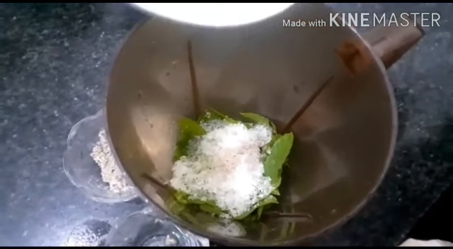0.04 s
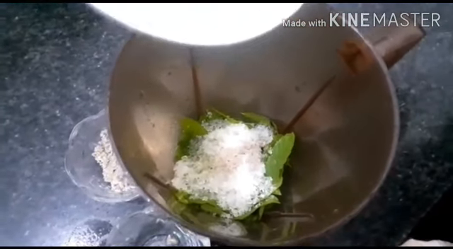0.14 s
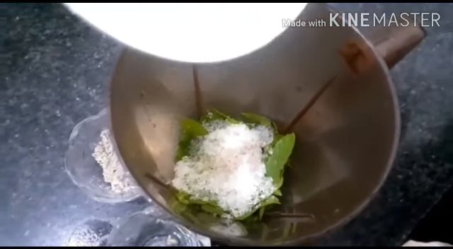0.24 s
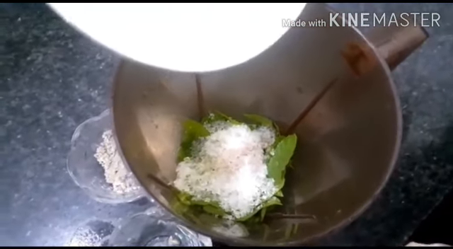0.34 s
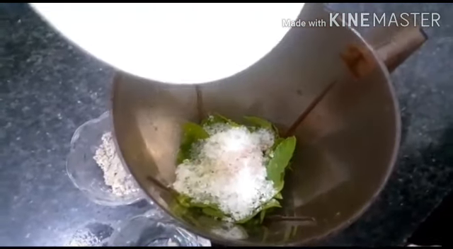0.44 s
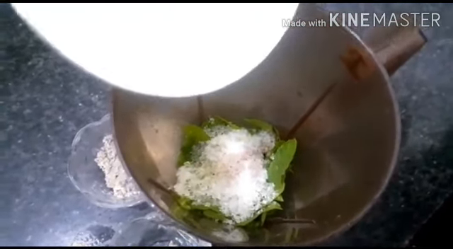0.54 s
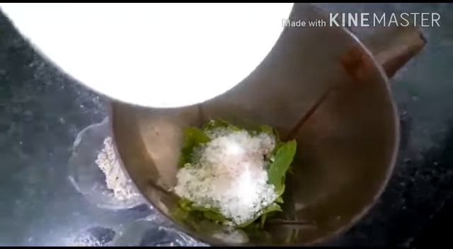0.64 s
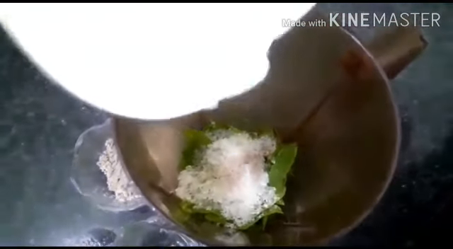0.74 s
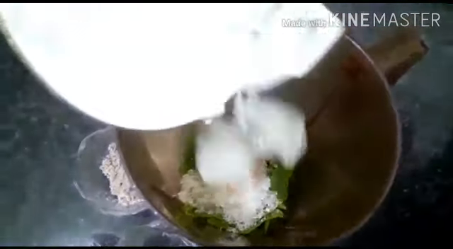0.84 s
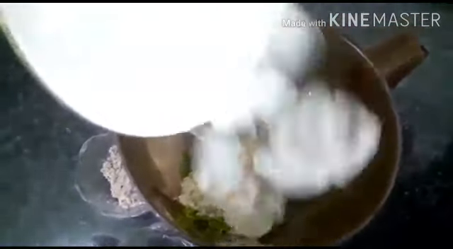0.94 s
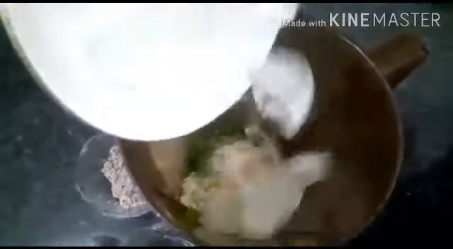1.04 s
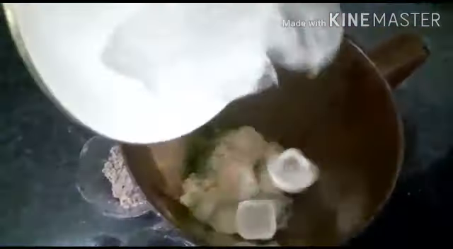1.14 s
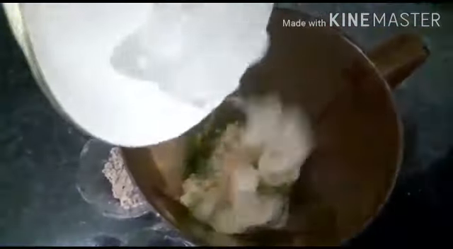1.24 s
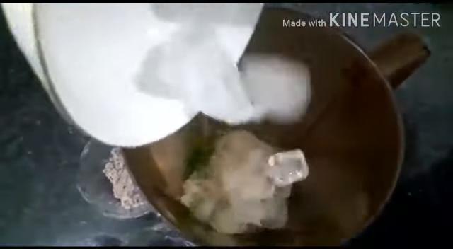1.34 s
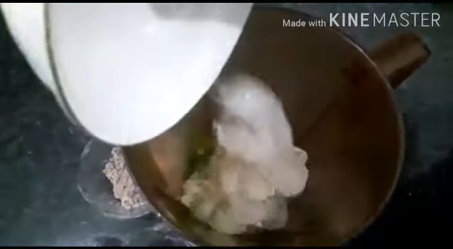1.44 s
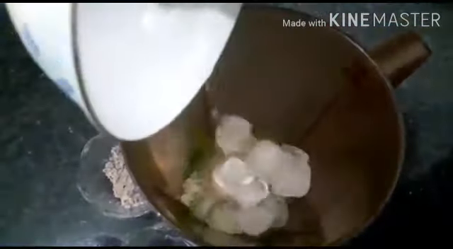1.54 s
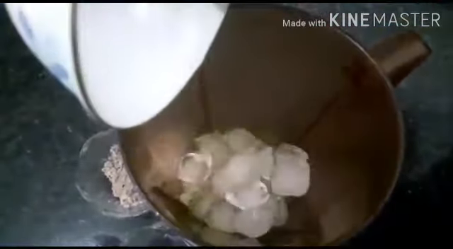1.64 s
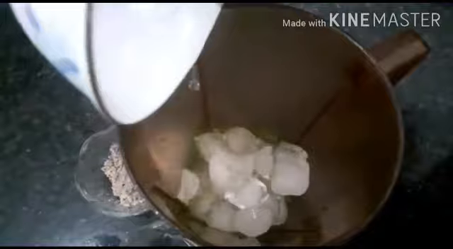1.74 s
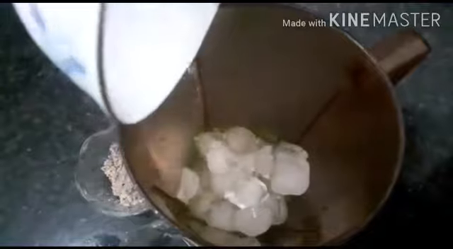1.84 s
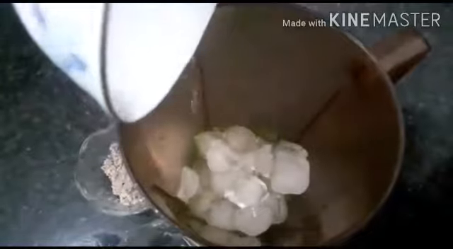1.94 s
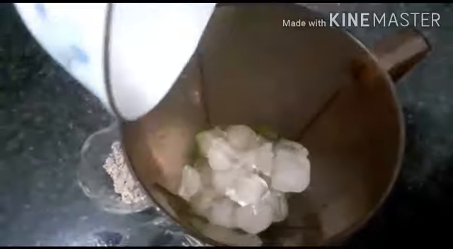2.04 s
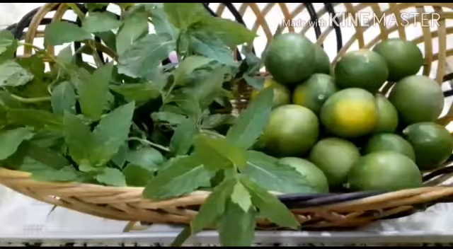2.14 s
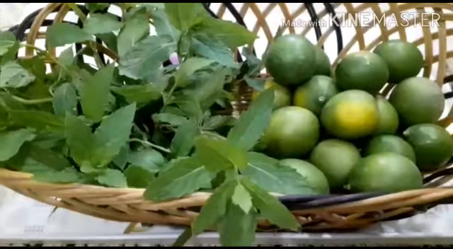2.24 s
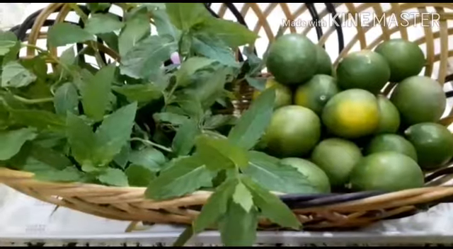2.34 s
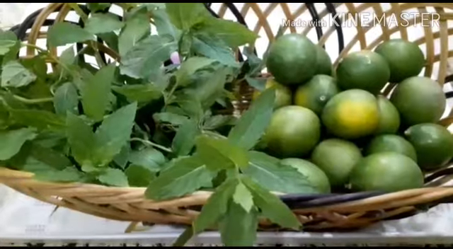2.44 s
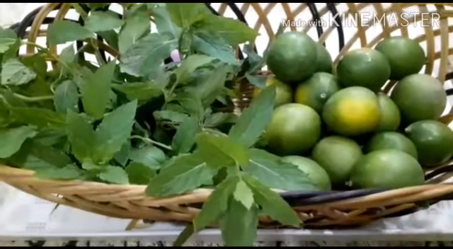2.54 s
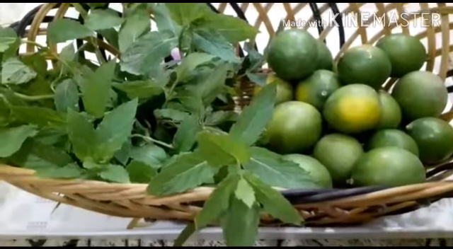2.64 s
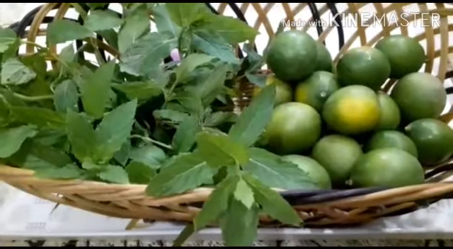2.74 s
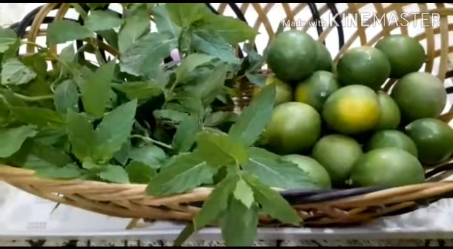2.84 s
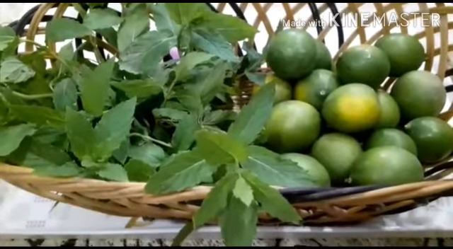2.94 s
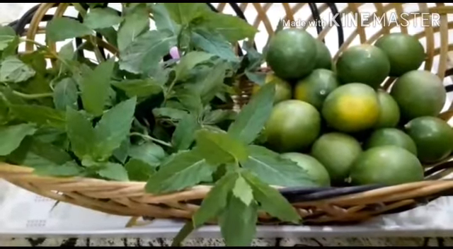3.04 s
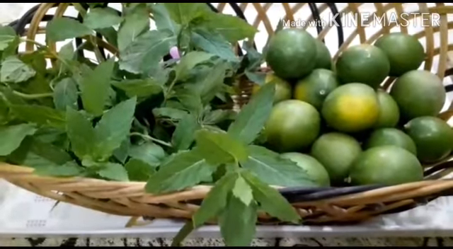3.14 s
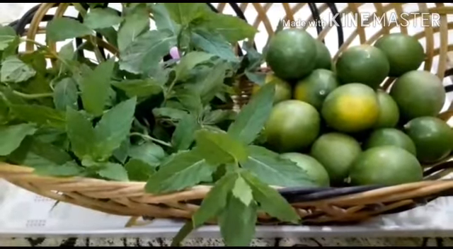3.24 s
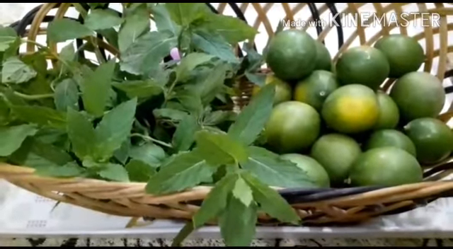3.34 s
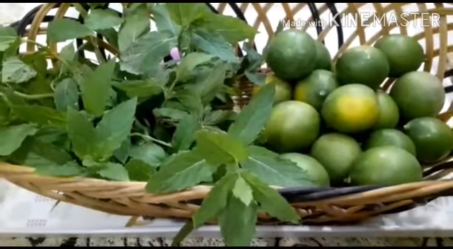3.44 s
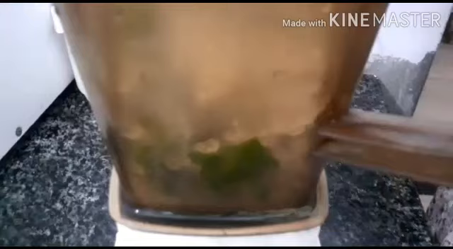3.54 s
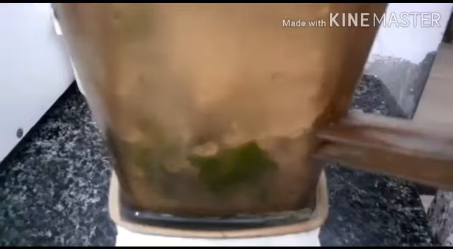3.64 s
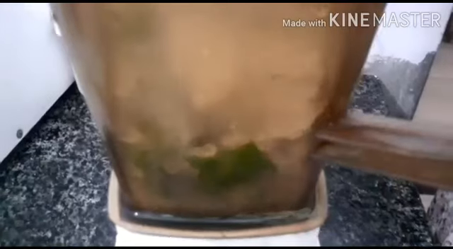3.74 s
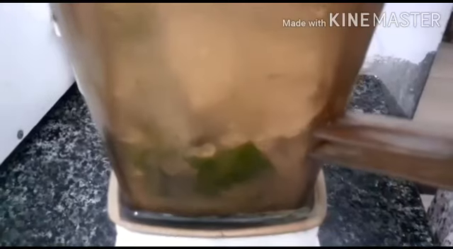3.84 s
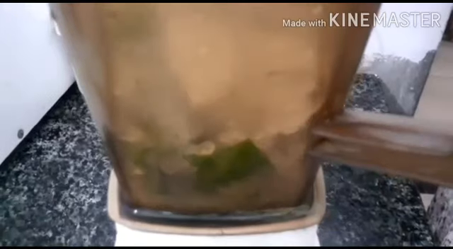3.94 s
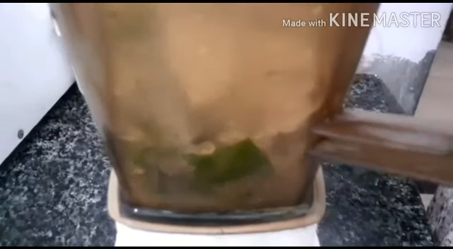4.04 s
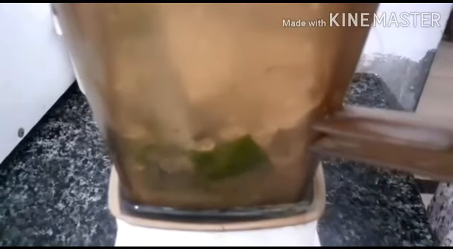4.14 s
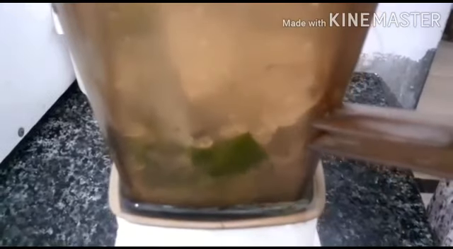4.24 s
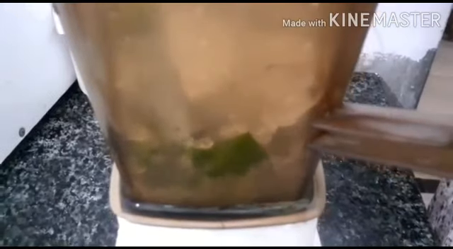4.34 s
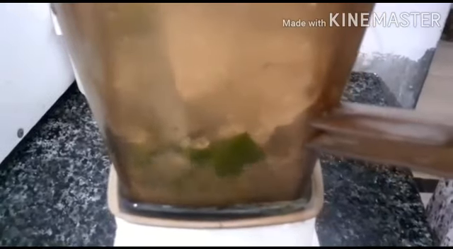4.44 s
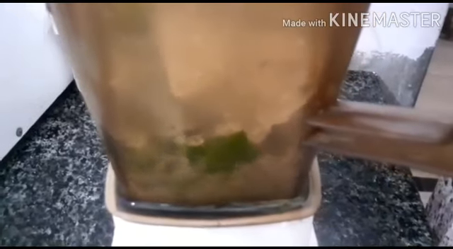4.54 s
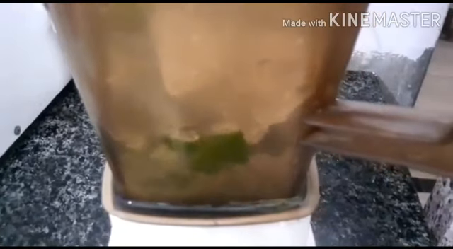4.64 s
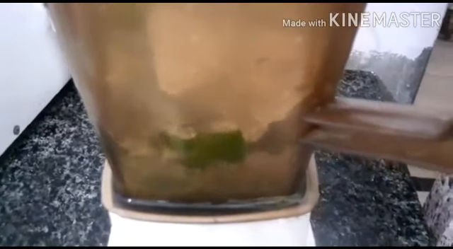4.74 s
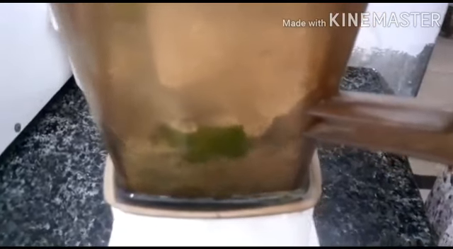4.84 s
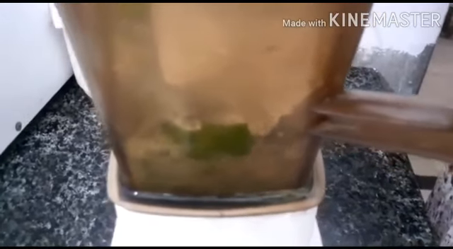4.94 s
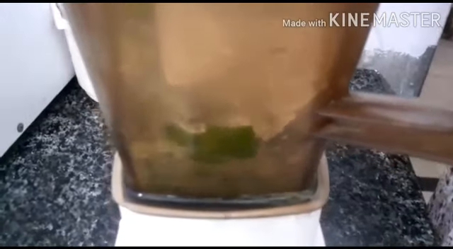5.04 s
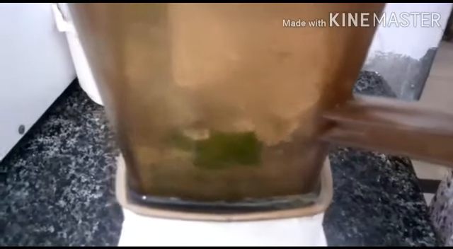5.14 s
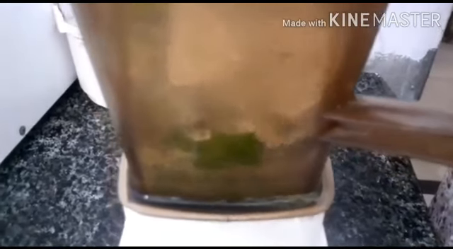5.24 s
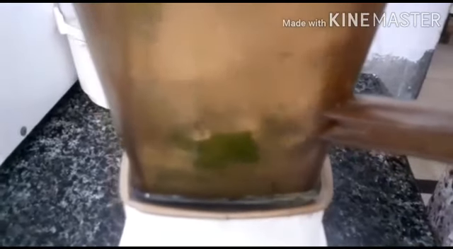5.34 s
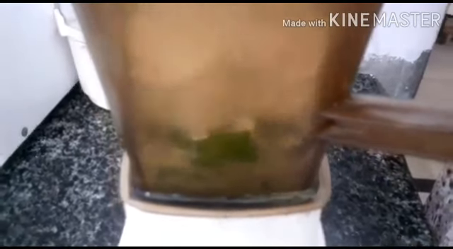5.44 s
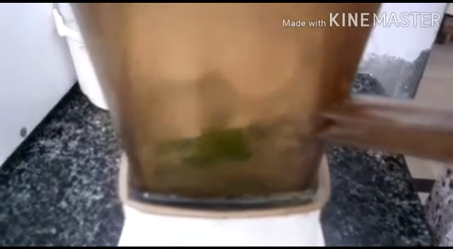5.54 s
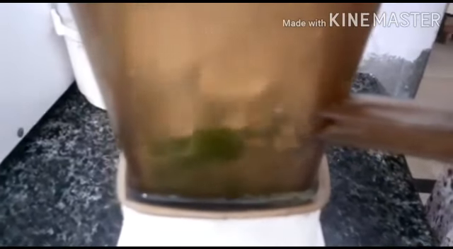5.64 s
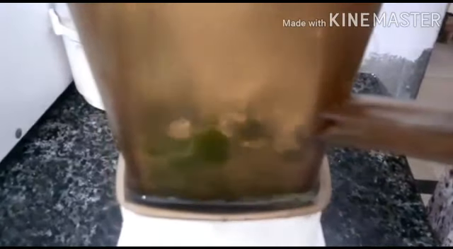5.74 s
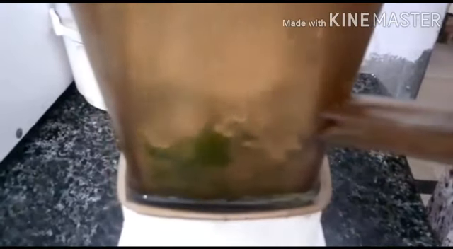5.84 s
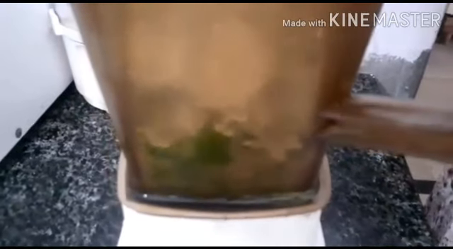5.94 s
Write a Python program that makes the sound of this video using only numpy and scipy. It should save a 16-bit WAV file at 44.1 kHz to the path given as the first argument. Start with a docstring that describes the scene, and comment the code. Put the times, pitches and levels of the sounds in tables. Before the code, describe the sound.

In a tiled kitchen, close up, a bowl thumps a hollow blender jar, then ice slides and tumbles in with bright cracks and ringing knocks. A short cut leads to faint room air. Then a blender motor roars steadily over churning slush, is switched off, and falls in pitch while the last lumps rattle.

```python
"""Ice poured and blended

Three short kitchen scenes. A bowl bumps a blender jar and tips ice cubes into it; a quiet room;
then the blender runs on ice, leaves and sugar, is switched off and coasts down while the last lumps rattle.
Knocks are damped modes and short noise bursts, the motor is a bank of shaft overtones,
and slush, brush hiss, sliding ice and room air are coloured noise."""
import sys
import numpy as np
from scipy import signal
from scipy.fft import rfft, irfft, next_fast_len
from scipy.io import wavfile

SR = 44100
rng = np.random.default_rng(int(sys.argv[2]) if len(sys.argv) > 2 else 0)


def master(y):
    """Save y as 16-bit WAV."""
    cut = np.clip(np.atleast_2d(y).T, -1, 1)
    pcm = np.round(cut * 32767)  # scale
    wavfile.write(sys.argv[1], SR, pcm.astype(np.int16))


N = 263718
TIME = np.arange(N) / SR

# ice striking the jar, poured in, later kicked by the blades; callers offset the levels:
# (time [s], knock level [dB], crack level [dB], knock pitch [Hz])
ICE_HITS = [(1.027, -11.5, -20.5, 1712), (1.058, -22, -23.5, 2200), (1.088, -12, -24.5, 1693),
            (1.103, -18, -21.5, 900), (1.112, -17.5, -22, 1770), (1.128, -15, -18, 990),
            (1.141, -12, -23, 1780), (1.171, -23, -33, 991), (1.222, -13.5, -19.5, 1720),
            (1.293, -18, -30, 1770), (1.359, -13, -20, 998), (1.494, -32, -35.5, 1026),
            (1.506, -16.5, -18.5, 1003), (1.532, -20, -28, 1760), (1.577, -14, -21.5, 950),
            (1.599, -28, -28.5, 851), (1.647, -19.5, -24.5, 936), (1.664, -30, -36, 850),
            (1.729, -19.5, -23.5, 948), (1.744, -22.5, -22, 950), (1.821, -37, -32.5, 1010),
            (1.838, -37, -36, 1820), (5.386, -18, -20.5, 1010), (5.503, -23, -27.5, 1090),
            (5.612, -25, -29, 1010), (5.683, -21.5, -19.5, 990), (5.7, -27, -20.5, 1100),
            (5.723, -25, -24, 985), (5.748, -26, -27, 1020), (5.864, -30, -45, 943),
            (5.911, -30.5, -46, 921)]
# spectra of a lump's knock, its crack and the thud on the base: (frequency [Hz], density [dB per Hz])
KNOCK_SPECTRUM = [(400, -15.5), (700, -4.5), (1000, 4.5), (1400, -7.5), (1780, 9), (2200, -6), (2800, -15)]
CRACK_SPECTRUM = [(1350, -26.5), (2300, 3.5), (2410, -2), (2630, 2.5), (2950, -4), (3240, 0), (4830, -3.5),
                  (5990, -4), (7200, -11.5), (8250, -10.5), (10100, -24.5), (13000, -18), (15500, -26.5)]
THUD_SPECTRUM = [(120, -34.5), (240, -13), (315, 6), (400, -8.5), (480, 3.5), (620, -14.5), (900, -26)]
# stereo balance of room air and of motor noise: (frequency [Hz], left-right difference [dB])
AIR_BALANCE = [(100, -1.5), (400, -4.5), (5000, -5)]
MOTOR_BALANCE = [(100, 2), (260, -8), (500, 8.5), (1000, -5), (2000, -1), (4500, -3), (8000, -2),
                 (12000, 4)]

RUN_HZ, OFF_S, COAST_FROM_S = 261.3, 4.96, 4.983  # shaft speed; switch-off; start of coasting
ICE_T60_S, ICE_RISE_S, ICE_PAN_DB = .047, 0.0023, -2.8
HEAP_FROM_S = 1.125  # ice starts to pile up in the jar


def amp(db):
    """Decibels to amplitude."""
    return 10 ** (np.asarray(db) / 20)


def unit(x):
    """Scales to unit RMS."""
    return x / np.sqrt(np.mean(x ** 2) + 1e-20)


def ramp(start_s, length_s):
    """Rises from 0 to 1 over a stretch of time."""
    return np.clip((TIME - start_s) / max(length_s, 1 / SR), 0, 1)


def read(points, hz):
    """A curve joined by straight lines over log frequency."""
    f, value = np.transpose(points)
    return np.interp(np.log(hz + 1), np.log(f + 1), value)


def shape(points):
    """A spectrum as a gain function that falls away beyond both ends."""
    low_hz, high_hz = points[0][0], points[-1][0]

    def gain(hz):
        low_cut = 1 + (low_hz / (hz + 1) / 2) ** 4
        high_cut = 1 + (hz / high_hz / 2) ** 4
        return amp(read(points, hz)) / low_cut / high_cut
    return gain


def peaks(modes, hz):
    """Power-summed gain of resonances, each with centre, half-power width and level."""
    return np.sqrt(sum(amp(db) ** 2 / (1 + (2 * (hz - f) / width) ** 2) for f, width, db in modes))


def sides(db):
    """Left and right gains for a level difference."""
    return amp(np.array([db, -db]) / 2).reshape(2, -1)


def add(mix, s, sound):
    """Adds a sound at a time, cut off at the end of the mix."""
    part = mix[:, max(round(s * SR), 0):][:, :sound.shape[1]]
    part += sound[:, :part.shape[1]]


def wander(rate_hz):
    """Slow random fluctuation of unit RMS."""
    hz = np.fft.rfftfreq(N, 1 / SR)
    return unit(irfft(rfft(rng.standard_normal(N)) / (1 + (hz / rate_hz) ** 4), N))


def noise(gain, size=N, pan=((100, 0), (10000, 0))):
    """Coloured noise at two microphones, alike in the bass and unrelated in the treble."""
    # (frequency [Hz], left-right correlation [-])
    likeness = [(100, 0.74), (300, 0.72), (600, 0.72), (1000, 0.45), (2000, 0), (15000, 0.015)]
    length = next_fast_len(size, True)
    hz = np.fft.rfftfreq(length, 1 / SR)
    a, b = rfft(rng.standard_normal((2, length)))
    same = np.clip(read(likeness, hz), -1, 1)
    pair = np.array([a, same * a + np.sqrt(1 - same ** 2) * b])
    return unit(irfft(pair * gain(hz) * sides(read(pan, hz)), length)[:, :size])


def burst(gain, t60_s, rise_s, size=8192):
    """A dense cluster of short modes as decaying noise, unit RMS over its first 20 ms."""
    t = np.arange(size) / SR
    onset = 1 - np.exp(-(t / rise_s) ** 2)
    cluster = noise(gain, size=size) * onset * amp(-60 * t / max(t60_s, .004))
    return cluster / np.sqrt(np.mean(cluster[:, :SR // 50] ** 2))


def ring(modes, size=16384, rise_s=.001):
    """Damped modes (Hz, dB, t60 s), own phase per microphone, unit RMS over the first 20 ms."""
    t = np.arange(size) / SR
    phases = 2 * np.pi * rng.random((len(modes), 2, 1))
    out = 0
    for (hz, db, t60_s), (start, spread) in zip(modes, phases):
        apart = np.array([[0], [1]]) * (spread - np.pi) * min(hz / 2400, 1)
        out = out + amp(db - 60 * t / max(t60_s, .005)) * np.sin(2 * np.pi * hz * t + start + apart)
    out = out * (1 - np.exp(-t / rise_s))
    return out / np.sqrt(np.mean(out[:, :SR // 50] ** 2))


def room(x, gap_s=0.0028):
    """Tiled kitchen: a diffuse tail after a short gap, each band dying at its own speed."""
    # (frequency [Hz], reverberation time t60 [s])
    band_t60 = [(150, 1), (400, 0.53), (1000, 0.53), (2000, 0.52), (4500, 0.43), (8000, 0.35),
                (15000, 0.51)]
    tail = noise(np.ones_like, size=SR) * np.clip(TIME[:SR] / gap_s - 1, 0, 1)
    hz, t, z = signal.stft(tail, SR, nperseg=256)
    decay = amp(-60 * t / read(band_t60, hz)[:, None])
    tail = signal.istft(z * decay, SR, nperseg=256)[1]
    return signal.fftconvolve(x, tail / np.linalg.norm(tail[0]), axes=1)[:, :N]


def quiet_room():
    """Steady room air as coloured noise."""
    # (frequency [Hz], density [dB per Hz])
    air_spectrum = [(18, -52), (30, -26.5), (75, -21), (125, 1), (158, -10), (185, -4.5), (337, 0.5),
                    (364, 0), (426, -11), (612, -17.5), (881, -18), (1030, -23), (2630, -40), (2920, -44),
                    (15000, -51)]
    return amp(-54.5) * noise(shape(air_spectrum), pan=AIR_BALANCE)


def kitchen_air():
    """Room air as coloured noise, joined by a faint phase-wandering tone late in the pouring."""
    # (frequency [Hz], density [dB per Hz])
    air_spectrum = [(18, -45.5), (30, -29), (92, -3), (200, -4), (260, -11), (304, 2.5), (426, -16.5),
                    (497, -8.5), (774, -29.5), (859, -13.5), (1110, -27), (1780, -26), (15000, -52)]
    air = amp(-48.5) * noise(shape(air_spectrum), pan=AIR_BALANCE)
    tone = np.sin(2 * np.pi * 520 * TIME + .4 * wander(12))
    return air + amp(-52) * ramp(2.05, 0.036) * tone


def bumps(tick_t60_s=0.06, boom_db=-16, boom_t60_s=0.53, boom_rise_s=.02):
    """The bowl knocks the jar: damped modes and a tick; the hollow jar and base boom on."""
    # bowl against jar: (time [s], ring level [dB], tick level [dB])
    blows = [(0.009, -10, -26), (0.3233, -32, -38)]
    # jar on its base: (frequency [Hz], level [dB], t60 [s])
    base_modes = [(194, -14, 0.07), (270, -20, 0.017), (324, 11.5, 0.024), (457, 9.5, 0.034),
                  (594, -11.5, .06), (863, -16.5, 0.13), (999, -11.5, 0.099), (1074.6, -9, 0.12),
                  (1550, -21, 0.053), (1750, -26.5, .1), (2094, -28, 0.058)]
    boom_modes = [(151, -9), (318, -2), (337, 1), (455, -6), (490, -2.5), (598, -16), (1005, -16.5)]  # Hz, dB
    tick = shape([(400, -8.5), (850, 5.5), (1100, 6.5), (1400, -4), (1800, -5), (3000, -10.5),
                  (6000, -24.0), (15000, -43.5)])  # Hz, dB per Hz
    out, t = np.zeros((2, N)), TIME[:SR]
    for s, ring_db, tick_db in blows:
        blow = sum(amp(db - 60 * t / t60_s) * np.sin(2 * np.pi * hz * t) for hz, db, t60_s in base_modes)
        boom = sum(amp(db + boom_db - 60 * t / boom_t60_s) * np.sin(2 * np.pi * hz * t)
                   for hz, db in boom_modes)
        blow = blow * (1 - np.exp(-(t / 0.0022) ** 2))
        boom = boom * (1 - np.exp(-t / boom_rise_s))
        add(out, s, amp(ring_db) * (blow + boom) * sides(-1.5))
        add(out, s, amp(tick_db) * burst(tick, tick_t60_s, .002))
    return out


def bowl(knock_t60_s=0.012, crack_t60_s=.012, scrape_db=-6, thud_t60_s=.2):
    """Cubes slide and clink in the hand-held bowl, which damps them quickly."""
    # cubes knocking together: (time [s], knock level [dB], crack level [dB])
    clinks = [(0.777, -39, -49.5), (0.859, -40.5, -53.5), (0.886, -33, -45.5), (0.900, -19, -33),
              (0.933, -38.5, -38), (0.964, -41.5, -29.5), (0.978, -37, -23)]
    # bowl resonances, gain squared below: (frequency [Hz], width [Hz], level [dB])
    wall_modes = [(1610, 150, 1), (1780, 250, 0.5), (2134, 73, -7)]
    # cube resonances, gain to the power 1.3 below: (frequency [Hz], width [Hz], level [dB])
    cube_modes = [(2900, 1600, -8), (3900, 700, 2.5), (5300, 900, -10), (6600, 700, -1),
                  (12500, 2500, -13.5)]
    creep_s, loose_s, rim_s = 0.39, .78, 1.02  # ice creeps, breaks loose, leaves over the rim
    creep_db, slide_db, growth_db_per_s, release_db_per_s = -70, -39.5, 48, 599.5

    def wall(hz):
        return peaks(wall_modes, hz) ** 2

    def cube(hz):
        return peaks(cube_modes, hz) ** 1.3

    # louder up to the rim, then a fast release
    growth_db = np.minimum(growth_db_per_s * (TIME - rim_s), release_db_per_s * (rim_s - TIME))
    slide = ramp(loose_s, .005) * amp(slide_db + growth_db)
    creep = amp(creep_db) * (ramp(creep_s, .02) - ramp(creep_s, loose_s - creep_s)).clip(0)
    brightening_db = -11 * (0.5 - ramp(.88, .08))  # brighter as the cubes speed up
    grain_db = 4 * wander(350)
    scrape = slide * amp(scrape_db + brightening_db + grain_db) + creep
    out = amp(3.5 * wander(70)) * (slide * noise(wall) + scrape * noise(cube))
    for s, knock_db, crack_db in clinks:
        clink = amp(knock_db) * burst(wall, knock_t60_s, .0014)
        clink += amp(crack_db) * burst(cube, crack_t60_s, 0.00088)
        thud = amp(-25.5 + .5 * knock_db) * burst(shape(THUD_SPECTRUM), thud_t60_s, 0.0026)
        add(out, s, (clink + thud) * sides(-3))
    return out


def ice(hits, knock_db, ring_db, crack_db, crack_share, focus_hz, cushion_db_per_s=0, crack_rise=0.5,
        thud_t60_s=0.13, contact_db=5, grain_db=4):
    """Each lump cracks brightly, rings the jar's wall modes nearest its own pitch and thuds on the base."""
    # jar wall: (frequency [Hz], level [dB], t60 [s])
    jar_modes = [(713, -9.5, 0.13), (867, -3, 0.067), (995, -3.5, 0.15), (1004.4, 0, 0.085),
                 (1002, -3.5, .12), (1300, -16, .16), (1690, -5, .14), (1745, -3.5, 0.12), (1795, -4, .1),
                 (2204, -4, 0.11)]
    out = np.zeros((2, N))
    for s, knock, crack, pitch_hz in hits:
        def focus(hz):
            return 1 / (1 + ((hz - pitch_hz) / focus_hz) ** 2)

        def knock_gain(hz):
            return shape(KNOCK_SPECTRUM)(hz) * focus(hz)

        # every lump has its own colour
        grain = np.column_stack([np.linspace(2000, 16000, 50), grain_db * rng.standard_normal(50)])

        def crack_gain(hz):
            return shape(CRACK_SPECTRUM)(hz) * amp(read(grain, hz))

        loading = rng.uniform(.975, 1.025, len(jar_modes))  # the shifting heap detunes the wall
        modes = [(hz * load, db + 20 * np.log10(focus(hz)), t60_s)
                 for (hz, db, t60_s), load in zip(jar_modes, loading)]
        modes.append((pitch_hz, contact_db, ICE_T60_S))
        # the thud grows a little with the knock; the growing heap can cushion it
        cushion_db = cushion_db_per_s * max(s - HEAP_FROM_S, 0)
        thud_db = min(-22.5 + .35 * knock - cushion_db, knock - 4)
        hit = amp(knock + knock_db) * burst(knock_gain, ICE_T60_S, ICE_RISE_S)
        hit += amp(crack + crack_db) * burst(crack_gain, crack_share * ICE_T60_S, crack_rise * ICE_RISE_S)
        hit += amp(thud_db) * burst(shape(THUD_SPECTRUM), thud_t60_s, 0.00075)
        place = sides(ICE_PAN_DB + 0.85 * rng.standard_normal())
        add(out, s, hit * place)
        add(out, s, amp(knock + ring_db) * ring(modes, rise_s=ICE_RISE_S) * place)
    return out


def chatter(hits, count=3):
    """Cubes touch lightly: a graze of the heap just before landing, a few small ticks after."""
    out = np.zeros((2, N))
    knock_gain, crack_gain = shape(KNOCK_SPECTRUM), shape(CRACK_SPECTRUM)
    for s, knock_db, crack_db, _ in hits:
        if s > HEAP_FROM_S:
            graze = amp(knock_db) * burst(knock_gain, ICE_T60_S, ICE_RISE_S, size=2048)
            graze += amp(crack_db) * burst(crack_gain, ICE_T60_S, ICE_RISE_S, size=2048)
            add(out, s - .006, amp(-16) * graze * sides(ICE_PAN_DB))
        for wait, spread in zip(rng.exponential(1, count), rng.standard_normal(count)):
            tick_db = crack_db - 10 + 2.5 * spread - 4 * wait  # later ticks are softer
            tick = burst(crack_gain, t60_s=0.014, rise_s=.0004, size=2048)
            add(out, s + .035 * wait, amp(tick_db) * tick * sides(ICE_PAN_DB))
    return out


def pouring():
    """Bumps, sliding and falling ice excite the kitchen's echo over room air."""
    poured = [hit for hit in ICE_HITS if hit[0] < OFF_S]
    cubes = ice(poured, knock_db=-4.5, ring_db=-5, crack_db=-1.5, crack_share=1.0, focus_hz=950,
                cushion_db_per_s=18.5)
    cubes += chatter(poured)
    knocks, sliding = bumps(), bowl()
    echo = room(amp(-7.5) * cubes + amp(-3) * knocks + amp(-7.5) * sliding)
    return cubes + knocks + sliding + echo + kitchen_air()


def shaft_speed(sag_from_s=4.45, sag_hz_per_s=6, coast_tau_s=.74, dry_friction_hz=60):
    """Powered and true speed [Hz]: steady, sags as slush thickens, coasts on viscous and dry friction."""
    running = RUN_HZ - sag_hz_per_s * np.clip(TIME - sag_from_s, 0, OFF_S - sag_from_s)
    viscous = np.exp(-np.maximum(TIME - COAST_FROM_S, 0) / coast_tau_s)
    return running, (running + dry_friction_hz) * viscous - dry_friction_hz


def driven(speed, db, db_per_octave, knee_hz, steepness):
    """Gain of a motor layer: follows the speed gently, then dies away below the knee."""
    return amp(db + db_per_octave * np.log2(speed / RUN_HZ)) / np.sqrt(1 + (knee_hz / speed) ** (2 * steepness))


def nudges(turns, speed, t60_s=0.035, below_hz=90, pitch_hz=980):
    """Once a turn the slow blades push a lump against the wall, softer as the speed drops."""
    out = np.zeros((2, N))

    def wall(hz):
        return shape(KNOCK_SPECTRUM)(hz) / (1 + ((hz - pitch_hz) / 160) ** 2)

    new_turn = np.diff(np.floor(turns)) > 0
    for i in np.flatnonzero(new_turn & (speed[1:] < below_hz)):
        db = -31.5 + 5 * np.log2(speed[i] / below_hz) + 2.5 * rng.standard_normal()
        tap = burst(wall, t60_s, ICE_RISE_S, size=2048)
        tap += amp(-10) * burst(shape(CRACK_SPECTRUM), t60_s, ICE_RISE_S / 2, size=2048)
        add(out, i / SR, amp(db) * tap * sides(ICE_PAN_DB))
    return out


def rotor_hum(angle, speed, running, powered, unloaded, slowing, linger_db=-23, linger_t60_s=0.95):
    """The unbalanced rotor hums once a turn; the room briefly holds the running pitch."""
    shake_db = (0.46 + 2 * slowing) * wander(15)  # lumps of ice jolt the coasting rotor
    gain = driven(speed, db=-17.7, db_per_octave=11, knee_hz=88, steepness=5)
    hum = gain * amp(shake_db - 3 * unloaded) * np.cos(angle + np.array([[-.45], [0]]))
    # the held pitch beats against the falling hum
    linger = amp(linger_db - 60 * abs(TIME - OFF_S) / linger_t60_s)
    hum -= (1 - powered) * linger * np.sin(2 * np.pi * np.cumsum(running) / SR)
    return np.sqrt(2) * hum * sides(-7.5)


def blade_tone(angle, speed, mains, powered, unloaded, slowing, turn_rad=0.22):
    """Blade overtones sweep through the housing's resonances; the mains pulse adds side tones."""
    # (multiple of shaft speed [-], level under power [dB], level coasting [dB])
    overtones = [(1.992, -8, -2.5), (3.006, -1, -3.5), (4.027, -1, -3.5), (4.99, -0.5, -5.5),
                 (5.987, 3, -2), (7.99, -1, -0.5), (10, 0, -4), (11.8, -2, 1.5), (13.46, -5.5, -4),
                 (17.2, -24, -9), (21.6, -17, -32), (22.33, -6, -23), (30, -14, -30), (47, -20, -32)]
    # jar and motor base: (frequency [Hz], width [Hz], level [dB])
    housing = [(315, 75, 19), (420, 35, 9), (575, 60, 13), (1030, 100, 5)]
    side_tones = [(2, -1, -7.0), (1, 0.98, -12.5), (2, 1, -13.5)]  # shaft multiple, mains multiple, dB
    blades = np.zeros((2, N))
    for k, running_db, coasting_db in overtones:
        phase = k * angle + 2 * np.pi * rng.random() + .25 * wander(25)
        flutter_db = 2 * (1 + slowing) * wander(18.6)
        db = running_db + slowing * (coasting_db - running_db) + flutter_db
        resonance = (1 + peaks(housing, k * speed)) / 3
        blades += amp(db) * resonance * np.cos(phase + np.array([[turn_rad * k], [0]]))
    for k, side, db in side_tones:
        blades += amp(db) * powered * np.cos(k * angle + side * mains)
    dip = amp(-6 * unloaded * (1 - slowing))  # as the drive lets go
    return blades * dip * driven(speed, db=-23, db_per_octave=0.2, knee_hz=126, steepness=3) * sides(-3)


def chopped_slush(turns, speed, chop=0.11, lump_db=1.0):
    """Churning noise, pulsed by the blades at every turn and duller once they are slow."""
    # under power, then slow blades: (frequency [Hz], density [dB per Hz])
    churn = [(70, -16), (130, -13.5), (220, -5.5), (310, 4.5), (430, -3), (560, -1), (680, 3.5), (820, -1),
             (1030, 10.5), (1280, 0.5), (1550, 5.5), (1780, -2), (2020, 4.5), (2500, -12)]
    slosh = [(60, -33), (100, -11), (200, -7), (310, 0), (450, -2), (800, -7.5), (1020, -1), (1400, -4),
             (2100, -9.5), (3000, -18.5)]
    slow = ramp(COAST_FROM_S, .55)
    slush = np.sqrt(1 - slow) * noise(shape(churn), pan=MOTOR_BALANCE)
    slush += np.sqrt(slow) * noise(shape(slosh))
    strokes = unit(1 + chop * np.cos(2 * np.pi * turns) + 0.1 * np.cos(2 * np.pi * 2 * turns))
    # single shoves of the blades are heard near standstill
    gulps = 1 + .6 * np.clip((75 - speed) / 25, 0, 1) * np.cos(2 * np.pi * turns)
    gain = driven(speed, db=-23, db_per_octave=-0.36, knee_hz=77.5, steepness=2.5)
    return slush * strokes * gulps * gain * amp(lump_db * wander(68))


def brush_spray(speed, sparking, grit_db=-9, grit_per_s=260):
    """Brush hiss pulsing with the mains, ice chips ticking on the wall, whistling cooling air."""
    # (frequency [Hz], density [dB per Hz])
    hiss = [(1800, -5), (2600, 0), (3500, -2.5), (4600, 4.5), (5800, 0.5), (6600, -4), (8200, -2.5),
            (9700, -9.5), (11300, -4.5), (12000, -4.5), (12250, -3), (12600, -1), (14000, -8.5),
            (15500, -6.5)]
    # cooling air, gain squared below: (frequency [Hz], width [Hz], level [dB])
    whistles = [(4630, 27, 3), (5710, 110, 0), (8200, 120, -10), (11300, 160, -11), (11900, 130, -1.5)]
    chip_sizes = amp(5 * np.minimum(rng.exponential(1, N), 3.5))
    chips = (rng.random(N) < grit_per_s / SR) * chip_sizes
    grit = unit(signal.oaconvolve(chips, np.exp(-TIME[:512] / 0.0018))[:N])
    spray = sparking * amp(0.95 * wander(18)) * noise(shape(hiss), pan=MOTOR_BALANCE)
    spray += amp(grit_db) * grit * noise(shape(hiss))
    fan = 1 - ramp(5.4, 0.18)  # dies as the fan slows
    spray += amp(-9.0) * fan * noise(lambda hz: peaks(whistles, hz) ** 2)
    return spray * driven(speed, db=-23.5, db_per_octave=3, knee_hz=64.5, steepness=2.5)


def blender(mains_hz=100, ripple=0.044, wobble_rad=0.025):
    """One shaft drives hum, blades, slush and brushes; ice kicked by the coasting blades rattles."""
    running, speed = shaft_speed()
    turns = np.cumsum(speed) / SR
    angle = 2 * np.pi * turns + wobble_rad * wander(25)
    mains = 2 * np.pi * mains_hz * TIME
    powered, unloaded = 1 - ramp(OFF_S - .011, .011), ramp(OFF_S - .02, 0.038)
    slowing = np.clip((RUN_HZ - speed) / 70, 0, 1)
    tone = rotor_hum(angle, speed, running, powered, unloaded, slowing)
    tone += blade_tone(angle, speed, mains, powered, unloaded, slowing)
    sparking = 1 + ripple * powered * np.cos(mains)
    # a last lump is crushed between the slow blades
    crush = amp(8 * np.exp(-((TIME - 5.725) / .035) ** 2))
    churning = crush * (chopped_slush(turns, speed) + brush_spray(speed, sparking))
    kicked = [hit for hit in ICE_HITS if hit[0] > OFF_S]
    rattle = ice(kicked, knock_db=-2.5, ring_db=-4.5, crack_db=-1, crack_share=0.89, focus_hz=465)
    rattle += nudges(turns, speed)
    return tone + churning + rattle + amp(-6) * room(rattle)


def scene():
    """Three scenes, parted by short silences; the later two swell in."""
    # (start [s], end [s], swell-in time [s])
    spans = [(0, 2.188, 0), (2.27, 3.615, .19), (3.69, 6.1, .125)]
    out = np.zeros((2, N))
    for (start_s, end_s, swell_s), sound in zip(spans, [pouring(), quiet_room(), blender()]):
        gate = ramp(start_s, .008) * (1 - ramp(end_s - .008, .008))
        swell = amp(11 * (ramp(start_s, swell_s) - 1))  # from -11 dB
        out += gate * swell * sound
    return out


def record(dry, low_cut_hz=58, edge_hz=15550):
    """Soft overload on the loudest knocks, the microphone's bass cut, then the band limit."""
    held = dry / (1 + dry ** 6) ** (1 / 6)
    bass_cut = signal.butter(N=3, Wn=low_cut_hz, btype="high", fs=SR, output="sos")
    held = signal.sosfilt(bass_cut, held)
    band_limit = signal.firwin(511, edge_hz, window=("kaiser", 9), fs=SR)
    return signal.oaconvolve(held, band_limit[None], "same")


dry = scene()
out = record(dry)
master(out)
```